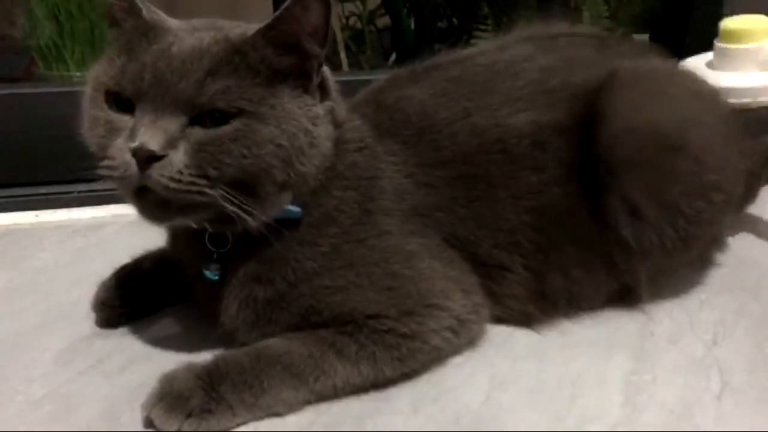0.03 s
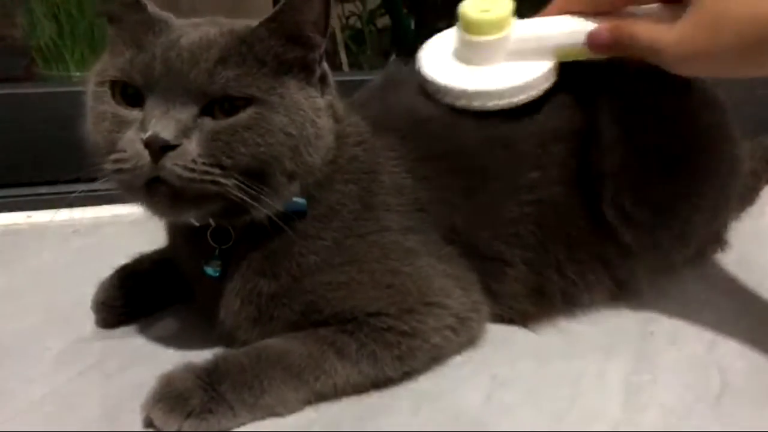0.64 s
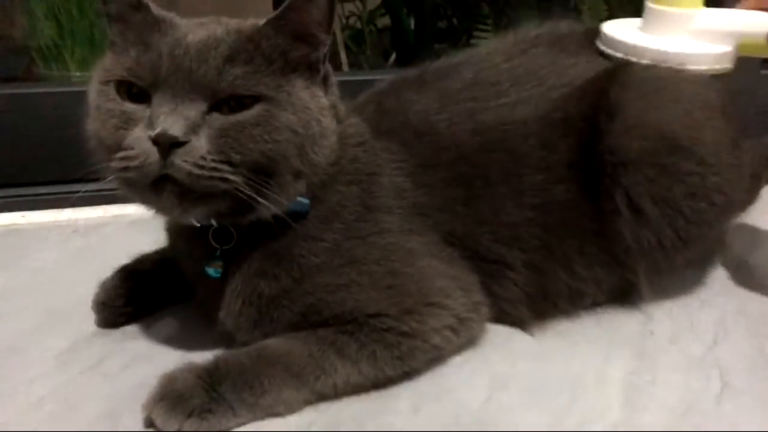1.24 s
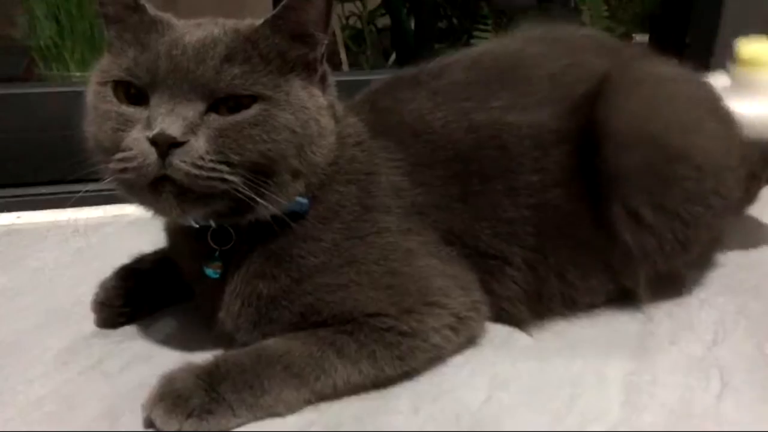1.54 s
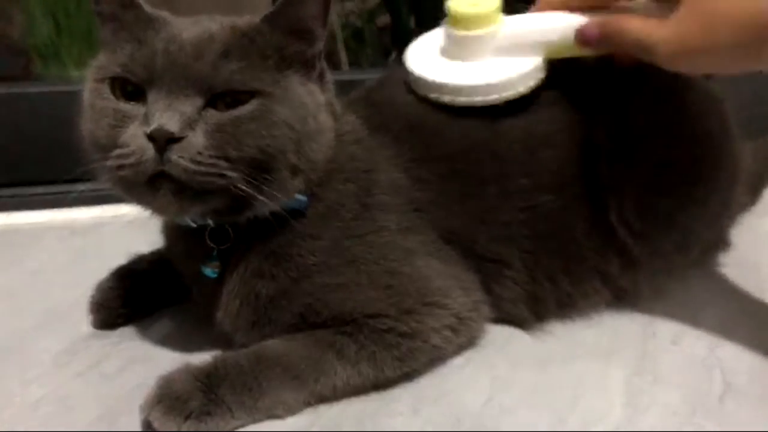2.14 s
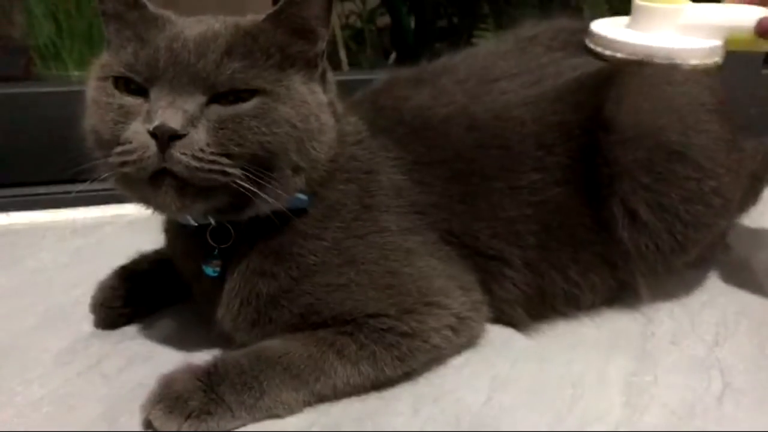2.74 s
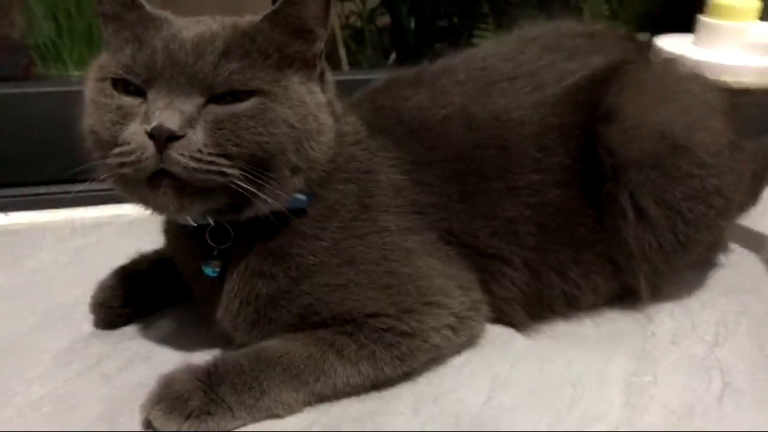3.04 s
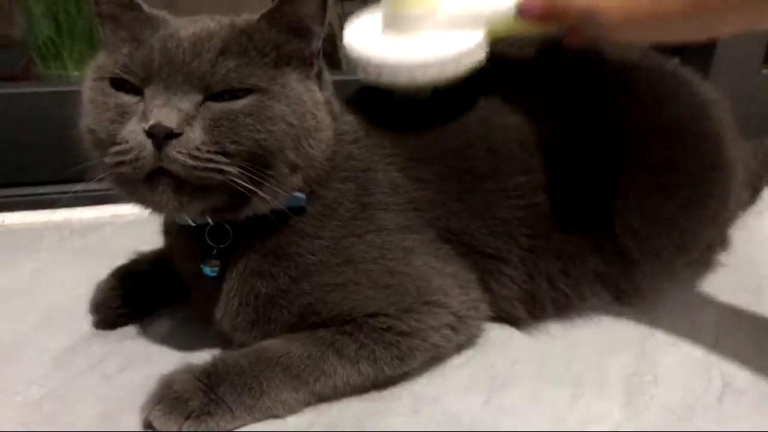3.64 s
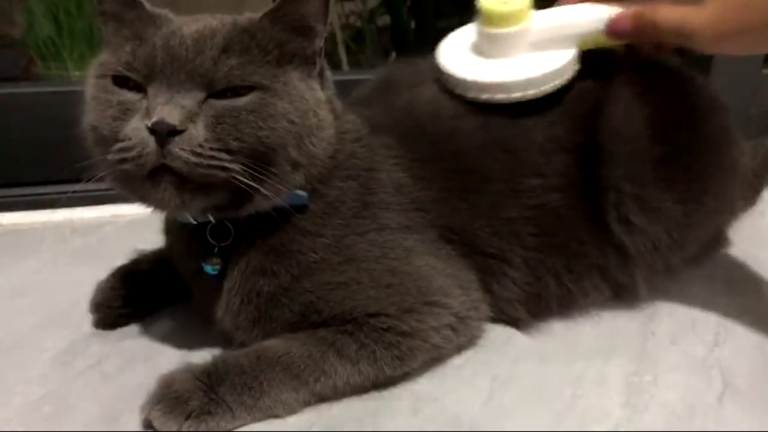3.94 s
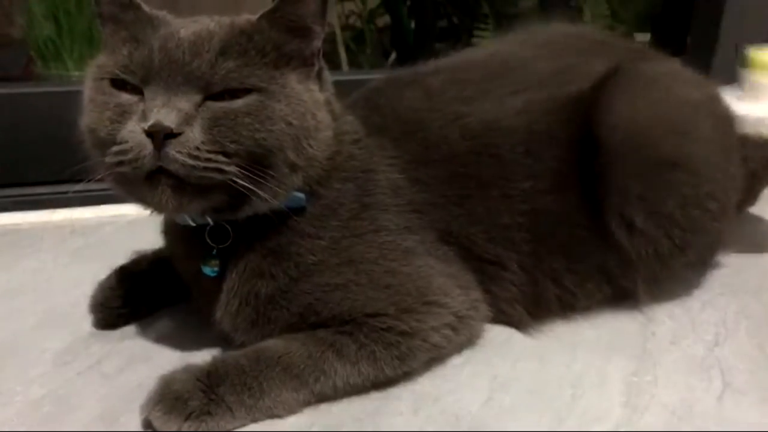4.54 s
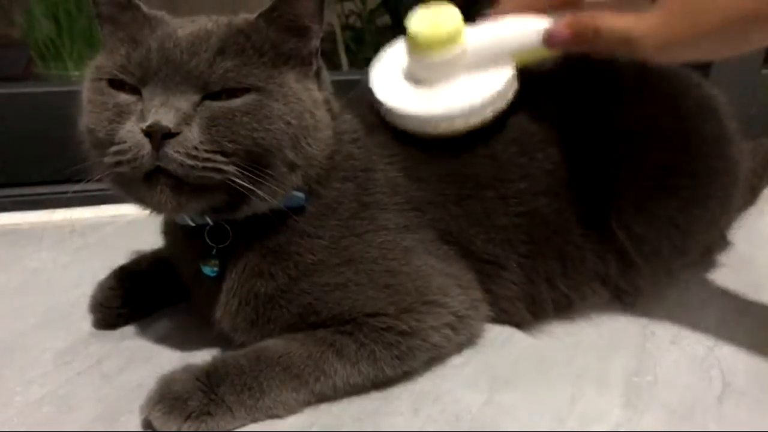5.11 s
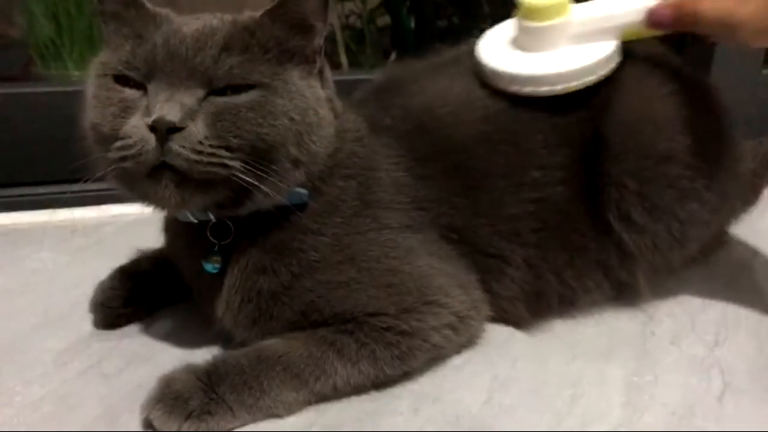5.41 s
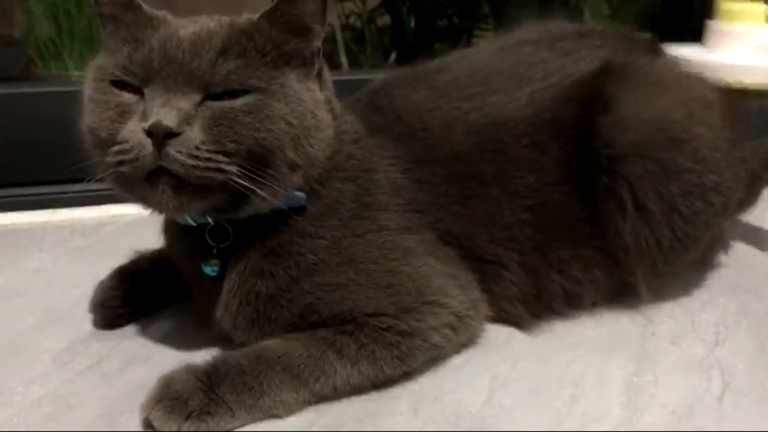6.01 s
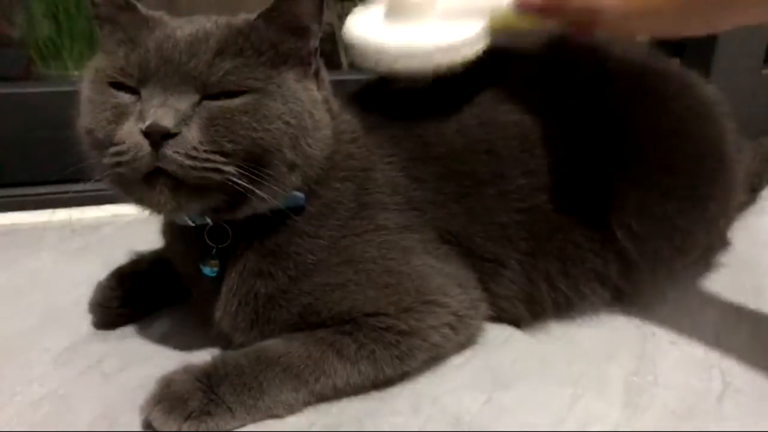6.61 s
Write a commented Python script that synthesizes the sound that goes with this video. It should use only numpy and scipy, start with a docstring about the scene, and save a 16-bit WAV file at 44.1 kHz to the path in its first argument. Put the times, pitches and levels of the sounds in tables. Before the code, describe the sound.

A plastic pin brush is drawn through a cat's fur in four slow, rustling strokes over a low ventilation hum and faint insects.

```python
"""A cat is groomed close to the microphone in a tiled room. A plastic pin brush flicks out of the coat;
farther off, ventilation hums and faint night insects sing throughout. Four slow strokes follow:
the loose head ticks, hairs slip past the pins and ring the pad and hollow head, the hand slows over
the hip, then at the rump the head tilts and scrapes and the last pins flick free.
At the end the brush knocks down on the cat's back for a fifth."""
import sys
import numpy as np
from scipy import signal
from scipy.fft import rfft, irfft, next_fast_len
from scipy.io import wavfile
from scipy.ndimage import uniform_filter1d, map_coordinates

SR = 44100
rng = np.random.default_rng(int(sys.argv[2]) if len(sys.argv) > 2 else 0)


def transcribe(signal):
    """Save signal, clipped to [-1, 1], as a 16-bit WAV file at the path in sys.argv[1]."""
    frames = np.atleast_2d(signal).T
    limited = np.clip(frames, -1, 1)
    pcm = np.round(limited * 32767).astype(np.int16)
    wavfile.write(sys.argv[1], SR, pcm)


N = 302526


def amp(db):
    """Decibels to gain."""
    return 10 ** (np.asarray(db) / 20)


def unit(x):
    """Scale to rms 1."""
    return x / np.sqrt(np.mean(abs(x) ** 2) + 1e-20)


def clock():
    """The time of every sample, in seconds."""
    return np.arange(N) / SR


def swell(centre_s, half_s):
    """A bell-shaped rise and fall; its half length is one standard deviation."""
    return np.exp(-.5 * ((clock() - centre_s) / half_s) ** 2)


def swells_db(rows):
    """A level curve in dB, one bell for each row of centre_s, half_s, height_db."""
    return sum(db * swell(s, half) for s, half, db in rows)


def wobble(rate):
    """A smooth random curve of rms 1, rate knots a second."""
    knots = rng.standard_normal(int(N * rate / SR) + 4)
    return unit(map_coordinates(knots, [clock() * rate], mode="nearest"))


def filtered(x, response):
    """x through a gain that is a function of frequency."""
    size = next_fast_len(N + SR // 2)
    return irfft(rfft(x, size) * response(np.fft.rfftfreq(size, 1 / SR)), size)[:N]


def coloured(x, points):
    """x through a spectrum of frequency_hz, level_db points on a log axis; rms 1."""
    f, db = np.transpose(points)
    return unit(filtered(x, lambda hz: amp(np.interp(np.log(hz + 1), np.log(f), db))))


def rung(x, modes):
    """x through a body's resonances, with the power of white noise kept."""
    def peaks(f):
        return sum(amp(db) * (1j * f * width / (hz * hz - f * f + 1j * f * width)) ** 2
                   for hz, width, db in modes)
    return filtered(x, lambda f: unit(peaks(f)))


def band(hz, width_hz):
    """A fuzzy tone of rms 1 whose centre may move."""
    phase = 2 * np.pi * np.cumsum(hz * np.ones(N)) / SR
    return unit(wobble(width_hz) * np.cos(phase) + wobble(width_hz) * np.sin(phase))


def bursts(events, rise_s, fall_s):
    """A quick rise and dying away for every contact."""
    ages = [(np.maximum(clock() - s, 0), db) for s, db in events]
    return sum(amp(db) * (1 - np.exp(-age / rise_s)) * np.exp(-age / fall_s) for age, db in ages)


def slips(rate, clump_db, clump_rate):
    """Tiny random impulses of hairs slipping off pins, rate a second, bunched by tufts."""
    grains = (rng.random(N) < rate / SR) * rng.standard_normal(N)
    return unit(grains * amp(clump_db * wobble(clump_rate)))


def patchy(x, depth_db):
    """Tufts of different stiffness colour the sound from moment to moment."""
    spectra = signal.stft(x, nperseg=1024)[2]
    patches = uniform_filter1d(rng.standard_normal(spectra.shape), size=5, axis=0)
    patches = uniform_filter1d(patches, size=5, axis=1)
    return signal.istft(spectra * amp(depth_db * unit(patches)), nperseg=1024)[1][:N]


# Strokes along the back, each level relative within its layer:
# touch_s, lift_s, sink_s, rustle_db, sheen_db, pad_db, hollow_db, rasp_db, scrape_db
STROKES = [(-0.9, 0.016, 0.26, -51, -55, -48, -54, -55, -40),
           (0.52, 1.520, 0.25, -48.8, -50.6, -51, -54, -56.5, -36.7),
           (2.11, 3.123, 0.21, -49.8, -52.3, -51.5, -55.5, -58.5, -39.5),
           (3.70, 4.505, 0.32, -49, -49, -50.7, -53, -52.5, -40),
           (5.08, 6.080, 0.33, -49.4, -50.1, -53.2, -58, -53, -45)]
# The hand slows over the hip: centre_s, half_s, speed_loss_db
HESITATIONS = [(1.22, 0.09, 2.0), (2.74, 0.085, 4.2), (5.85, 0.09, 0.6)]
def stroking():
    """Pin depth sets five layer gains; also gives hand speed (dB) and the way from back to rump (0-1)."""
    t = clock()
    rustle = sheen = pad = hollow = rasp = way = 0
    tilt_db, release_s, slowing_db = -2.6, 0.008, 2.6
    for touch, lift, sink, rustle_db, sheen_db, pad_db, hollow_db, rasp_db, _ in STROKES:
        # the pins sink in gradually, thin out as the head tilts, and leave all at once
        depth = np.sin(np.pi / 2 * np.clip((t - touch) / sink, 0, 1)) ** 2
        tilt = amp(tilt_db * swell(lift - 0.022, half_s=0.02))
        release = np.exp(-(np.maximum(t - lift, 0) / release_s) ** 2)
        contact = depth * tilt * release
        rustle += amp(rustle_db) * contact
        sheen += amp(sheen_db) * contact ** 1.7
        pad += amp(pad_db) * contact ** 1.15
        hollow += amp(hollow_db) * contact
        rasp += amp(rasp_db) * contact ** 0.8  # the tips rasp from the first touch
        way = np.where(t > touch, np.interp(t, [touch, lift], [0, 1]), way)
    speed_db = -slowing_db * way ** 2 - swells_db(HESITATIONS)
    return rustle, sheen, pad, hollow, rasp, speed_db, way


# Close modes of the pin pad: offset_hz, width_hz, relative_db
PAD_MODES = [(-195, 220, -3), (-30, 160, 0), (125, 160, -2)]
def pad_ring(hz):
    """The pad's modes flutter in level and wander in pitch as tufts tug at it; rms 1."""
    flutter_db, wander_hz = 1.5, 24
    return unit(sum(amp(db + flutter_db * wobble(16)) * band(hz + offset + wander_hz * wobble(12), width)
                    for offset, width, db in PAD_MODES))


# Spectra of the back's deep coat, the rump's thinner coat and fine hairs: frequency_hz, relative_db
BACK_SPECTRUM = [(250, -25), (500, -2), (750, -2.5), (1150, -0.5), (1650, -5.5), (2600, -6.5), (3400, -2.5),
                 (4200, -0.5), (5200, -5), (7000, -11.5), (9500, -18), (15000, -53)]
RUMP_SPECTRUM = [(250, -25), (500, -7), (750, -1.5), (1050, 3), (1600, -4), (2500, 0), (2850, 2),
                 (4000, -3.5), (5100, 0.8), (7000, -5.3), (9500, -11.5), (15000, -31)]
SHEEN_SPECTRUM = [(6000, -32), (9500, -10.5), (11200, 3.5), (12700, 0.5), (13600, -10), (15500, -69)]
# Modes of the pins while they comb: pitch_hz, width_hz, relative_db
RASP_MODES = [(3620, 420, 0), (4300, 620, 1), (4950, 380, -4)]
def brushing():
    """Close up, hairs rustle, hiss and rasp on the pins; pad and head ring lower as the hand slows."""
    rustle, sheen, pad, hollow, rasp, speed_db, way = stroking()
    speed = amp(speed_db)
    pad_hz, hollow_hz = 2135 + 25 * speed_db, 1180 + 55 * speed_db
    hairs = patchy(slips(rate=17000, clump_db=0.55, clump_rate=150), depth_db=1.9)
    tips = slips(rate=6500, clump_db=1.2, clump_rate=90)
    coat = (1 - way ** 2) * coloured(hairs, BACK_SPECTRUM) + way ** 2 * coloured(hairs, RUMP_SPECTRUM)
    body = amp(2.2) * rustle * speed * coat
    hiss = amp(-0.7) * sheen * speed ** 2.4 * coloured(hairs, SHEEN_SPECTRUM)
    scratch = rasp * speed ** 1.2 * unit(rung(tips, RASP_MODES))
    ring = pad * speed * pad_ring(pad_hz)
    head = hollow * speed ** 2 * band(hollow_hz, width_hz=380)
    return body + hiss + scratch + ring + head


# The motor tone sags: centre_s, half_s, drop_db
MOTOR_SAGS = [(1.65, 0.45, 14), (2.6, 0.08, 8), (6.25, 0.3, 8)]
# The boom swells: centre_s, half_s, rise_db
BOOM_SWELLS = [(1.12, 0.2, 7), (1.9, 0.08, 4), (5.25, 0.06, 10), (6.3, 0.17, 5)]
# A low hum near 145 Hz grows louder and softer: centre_s, half_s, change_db
LOW_HUM_SWELLS = [(0.1, 0.4, -3), (1.7, 0.12, -4), (2.35, 0.15, 3), (2.82, 0.12, 6.5), (3.52, 0.08, 5),
                  (6.0, 0.3, 3)]
# Spectra of the low rumble and the moving air: frequency_hz, relative_db
RUMBLE_SPECTRUM = [(25, -41), (36, -23), (47, -3), (64, -9.5), (85, -6.5), (113, -5.5), (142, -3),
                   (172, -9), (280, -7.7), (330, -13.7), (400, -20.5), (600, -34.5), (1200, -72)]
AIR_SPECTRUM = [(200, -5), (480, 4), (700, -1.5), (1050, 0.5), (1400, -5.5), (1900, -9.3), (2800, -12.5),
                (3400, -17), (4600, -16), (6000, -20.5), (9000, -20.5), (15500, -28.5)]
# Steady motor and duct tones: pitch_hz, width_hz, level_db
HUM_TONES = [(195.1, 6, -50.3), (242.2, 6, -55.5), (300.5, 5, -54.5), (349.2, 6, -62), (1075, 18, -67)]
def ventilation():
    """Room tone behind the cat: a motor, a duct's boom, a low hum, rumble and a fluttering rush of air."""
    motor_db = -42.5 - swells_db(MOTOR_SAGS) + 1.8 * wobble(14)
    motor_hz = 48.6 + 1.25 * wobble(7)
    motor = amp(motor_db) * np.sin(2 * np.pi * np.cumsum(motor_hz) / SR)
    boom = amp(-46.5 + swells_db(BOOM_SWELLS)) * band(hz=85, width_hz=28)
    rumble = amp(-40.5) * coloured(rng.standard_normal(N), RUMBLE_SPECTRUM)
    air = amp(-51.9 + 0.8 * wobble(45)) * coloured(rng.standard_normal(N), AIR_SPECTRUM)
    tones = sum(amp(db) * band(hz, width) for hz, width, db in HUM_TONES)
    low_hum = amp(-46 + swells_db(LOW_HUM_SWELLS)) * band(hz=145, width_hz=24)
    return motor + boom + low_hum + rumble + air + tones


# Voices of the insect chorus: pitch_hz, width_hz, relative_db
CHORUS_BANDS = [(4280, 150, -79), (3770, 170, -74.5), (4030, 300, -78), (8620, 380, -77)]
# The chorus swells: centre_s, half_s, rise_db
CHORUS_SWELLS = [(0.52, 0.12, 2.8), (2.25, 0.18, 3), (3.68, 0.18, 4.5), (5.08, 0.11, 5.5), (5.5, 0.2, 4.5),
                 (6.7, 0.14, 5.2)]
# Single insect calls: centre_s, half_s, pitch_hz, level_db
INSECT_CALLS = [(0.34, 0.15, 5340, -67.5), (2.02, 0.12, 5180, -68)]
def insects():
    """Far from the microphone, a thin night chorus around one wavering trill, and two nearer calls."""
    trill_db = -64.8 + 1.3 * wobble(22)
    trill_hz = 4255 + 5 * wobble(45)
    trill = amp(trill_db) * np.sin(2 * np.pi * np.cumsum(trill_hz) / SR)
    chorus = trill + sum(amp(db) * band(hz, width) for hz, width, db in CHORUS_BANDS)
    calls = sum(amp(db) * swell(s, half) * band(hz, width_hz=200) for s, half, hz, db in INSECT_CALLS)
    return amp(-1.4 + swells_db(CHORUS_SWELLS)) * chorus + calls


# Modes of the hollow head: pitch_hz, width_hz, relative_db
HEAD_MODES = [(890, 110, -2.5), (1028, 150, 4.5), (2066, 330, -5.5), (2160, 140, -7.5), (2770, 170, -6),
              (3420, 400, -30)]
def scraping(rows):
    """With few pins in the coat, coarser slips ring the head; rows are centre_s, half_s, level_db."""
    force = sum(amp(db) * swell(s, half) for s, half, db in rows)
    return rung(force * slips(rate=4000, clump_db=0.6, clump_rate=160), HEAD_MODES)


def tilting():
    """Just before each lift the tilted head drags softly, then scrapes."""
    rows = []
    for _, lift, *_, scrape_db in STROKES:
        drag = (lift - 0.1, 0.05, scrape_db - 8.5)
        scrape = (lift - 0.029, 0.019, scrape_db)
        rows += [drag, scrape]
    return amp(-5.0) * scraping(rows)


# Tufts of pins leave the coat: start_s, relative_db
FLICKS = [(0.012, -42), (1.513, -49), (1.520, -44), (3.116, -43.5), (3.122, -40), (4.502, -44.5),
          (4.507, -43), (6.060, -41.5), (6.076, -39.5), (6.081, -39)]
# Modes of the freed pins: pitch_hz, width_hz, relative_db
PIN_MODES = [(1100, 450, -6), (2150, 330, 0), (2850, 600, 3), (3620, 280, 6), (4400, 560, 1.5),
             (5960, 2000, 1.5), (8300, 1800, -5), (11500, 1600, -4.5)]
def flicking():
    """The last pins rip free, rung by a short burst of hair slips."""
    force = bursts(FLICKS, rise_s=0.0013, fall_s=0.0038)
    rips = force * slips(rate=11000, clump_db=1.2, clump_rate=600)
    return amp(4.5) * rung(rips, PIN_MODES)


# Pings of single pins: start_s, pitch_hz, relative_db
PLUCKS = [(0.013, 4200, -42), (1.514, 5900, -43), (1.522, 4200, -41), (3.124, 6100, -41),
          (4.501, 6300, -42), (4.508, 3550, -41), (6.061, 5900, -43), (6.082, 3575, -35.5),
          (6.082, 5560, -38)]
def plucking():
    """Single bent pins spring back, each with its own short ping."""
    return sum(bursts([(s, db)], rise_s=0.001, fall_s=0.0028) * np.sin(2 * np.pi * hz * (clock() - s))
               for s, hz, db in PLUCKS)


# Ticks of the head in its mount: start_s, level_db
HEAD_TICKS = [(0.524, -51), (0.565, -51), (0.606, -49), (0.647, -45.5), (2.193, -48), (2.203, -47),
              (2.281, -45), (3.074, -47), (3.086, -46), (3.808, -48), (3.888, -50), (4.549, -52),
              (5.348, -44), (6.060, -39), (6.738, -49), (6.777, -46), (6.784, -50), (6.814, -40),
              (6.817, -41.5)]
# Modes of the handle: pitch_hz, relative_db, t60_s
HANDLE_MODES = [(453, -2, 0.02), (1120, -1, 0.022), (1950, -8, 0.02), (2820, 0, 0.02), (4900, -10, 0.012)]
def rattling():
    """The loose head ticks as the brush lands, pulls and lifts, ringing the handle differently each time."""
    ticks, t = np.zeros(N + SR), np.arange(SR // 10) / SR
    detune_share, scatter_db = 0.015, 1.5
    for s, db in HEAD_TICKS:
        for hz, mode_db, t60 in HANDLE_MODES:
            detune, scatter = rng.standard_normal(2)
            decay = amp(db + mode_db + scatter_db * scatter - 60 * t / t60)
            pitch_hz = hz * (1 + detune_share * detune)
            ticks[round(s * SR):][:len(t)] += decay * np.sin(2 * np.pi * pitch_hz * t)
    return ticks[:N]


# Snags in the coat: centre_s, half_s, level_db
CATCHES = [(2.165, 0.02, -53), (2.205, 0.012, -47), (5.35, 0.012, -45), (6.857, 0.008, -43)]
def catching():
    """The head catches in the coat with a brief scrape as it sets off."""
    return scraping(CATCHES)


# Knocks of the pad: start_s, level_db
PAD_KNOCKS = [(6.780, -36), (6.819, -27)]
def landing():
    """The pad settles on the cat's back with two dull knocks."""
    pitch_hz, decay_s = 450, 0.003
    ages = [(np.maximum(clock() - s, 0), db) for s, db in PAD_KNOCKS]
    return sum(amp(db) * np.sin(2 * np.pi * pitch_hz * age) * np.exp(-age / decay_s) for age, db in ages)


def room(x):
    """A short wash from tiles and wall reaches the microphone just after the direct sound."""
    t = np.arange(SR // 2) / SR
    t60_s, delay_s, wet_db = .3, .003, -12.5
    tail = rng.standard_normal(len(t)) * amp(-60 * t / t60_s) * (t > delay_s)
    return amp(wet_db) * signal.fftconvolve(x, tail / np.linalg.norm(tail))[:N]


def scene():
    """From one spot beside the cat: the brush and its reflections, ventilation and insects behind."""
    brush = brushing() + tilting() + flicking() + plucking() + rattling() + catching() + landing()
    return (brush + room(brush) + ventilation() + insects())[None]


def record(dry):
    """A mono phone microphone keeps nothing above its band limit."""
    top_hz = 15700
    return filtered(dry[0], lambda hz: hz < top_hz)[None]


dry = scene()
out = record(dry)
transcribe(out)
```